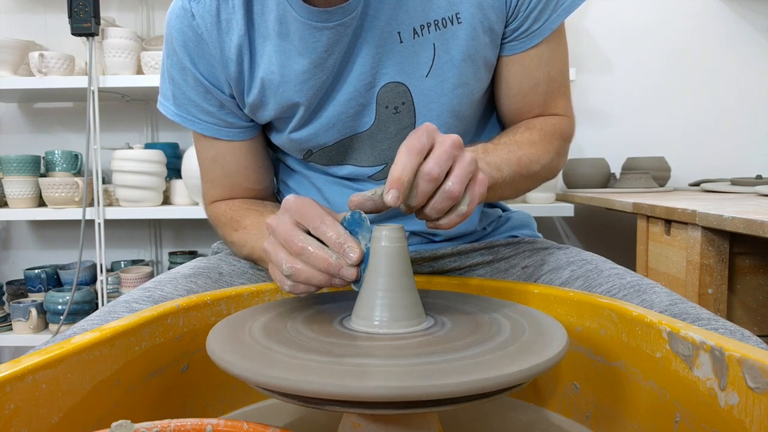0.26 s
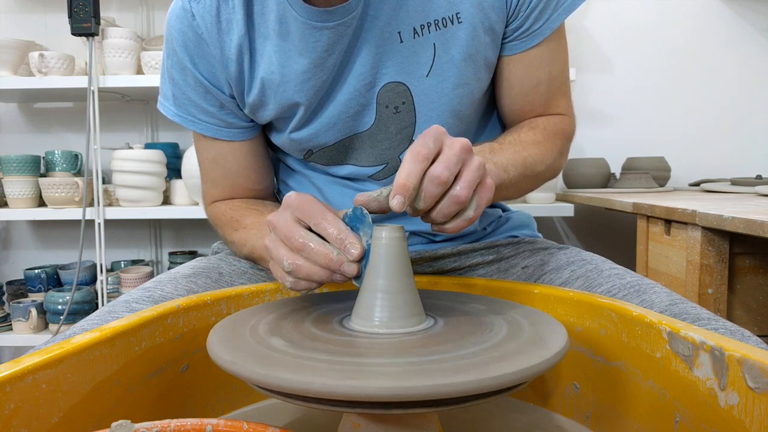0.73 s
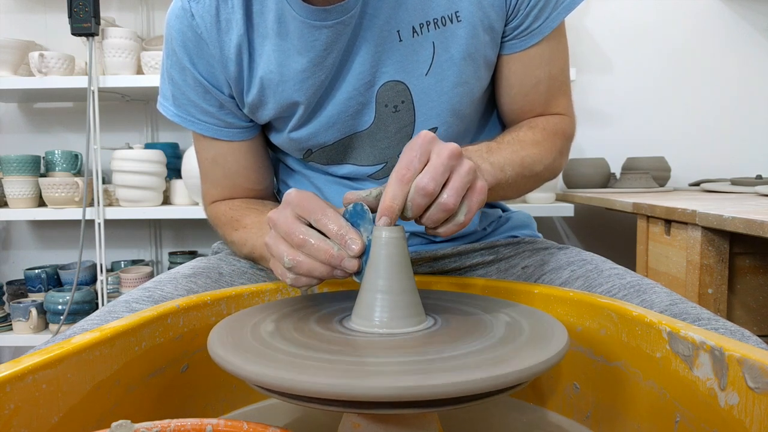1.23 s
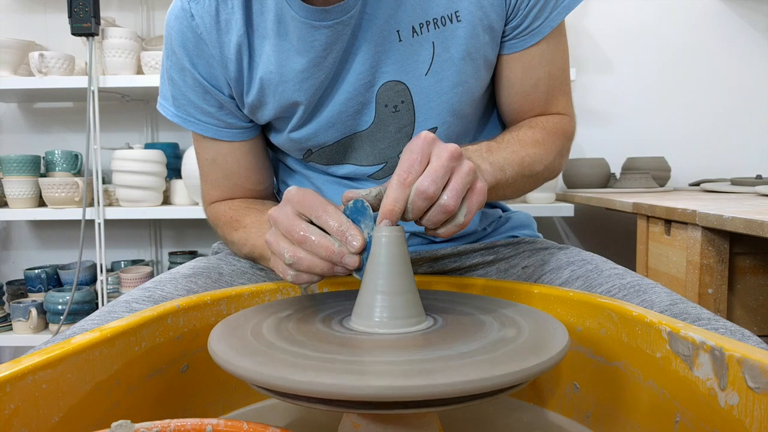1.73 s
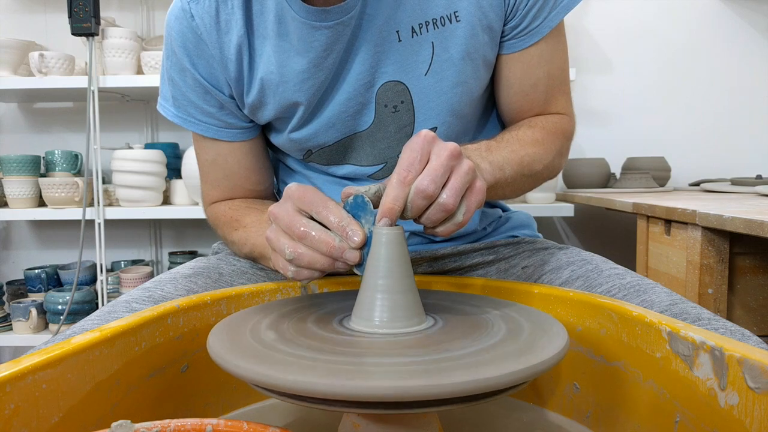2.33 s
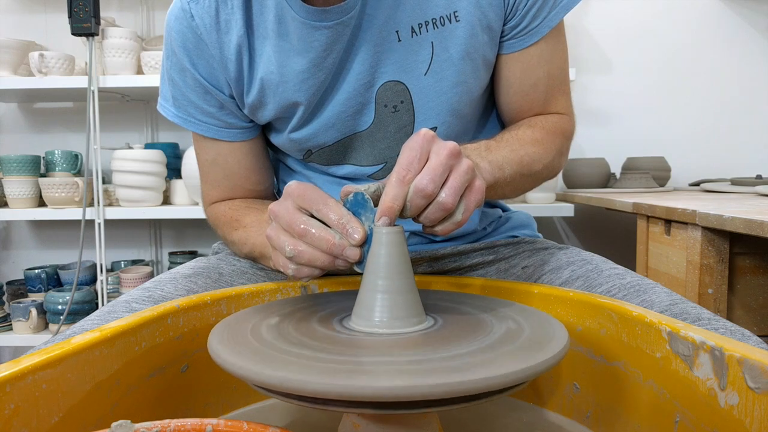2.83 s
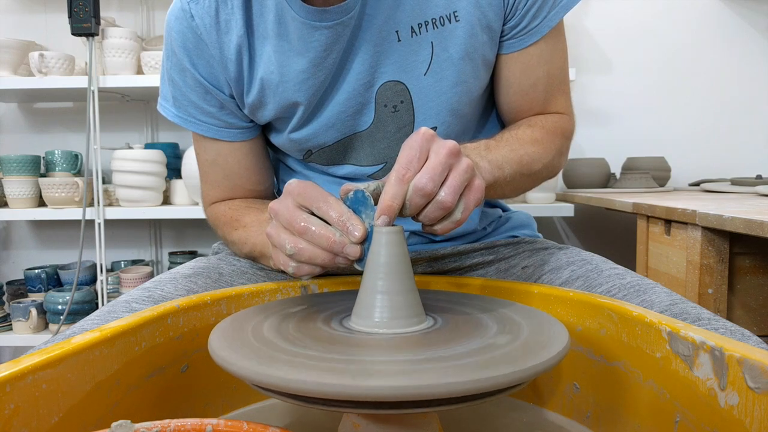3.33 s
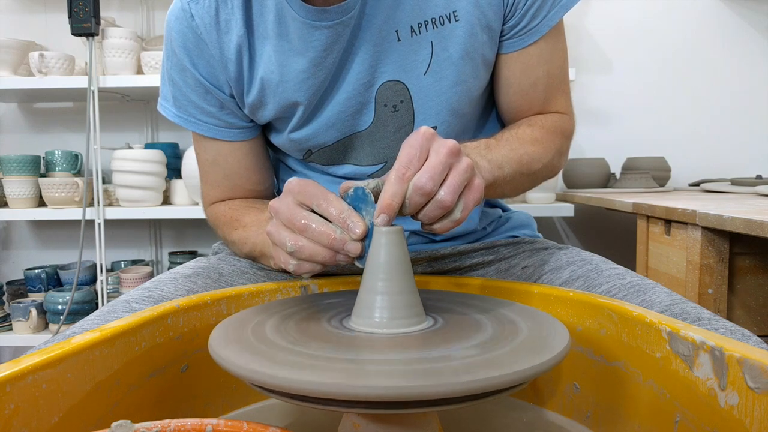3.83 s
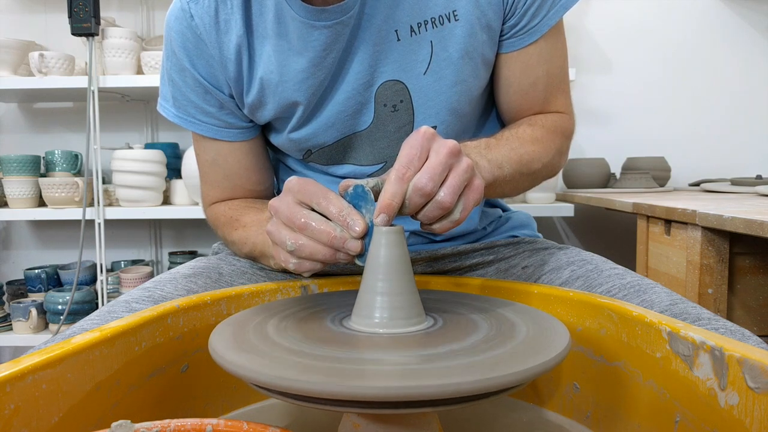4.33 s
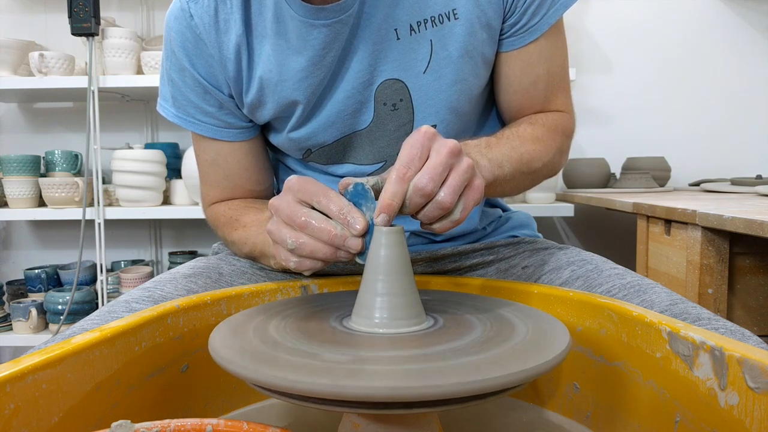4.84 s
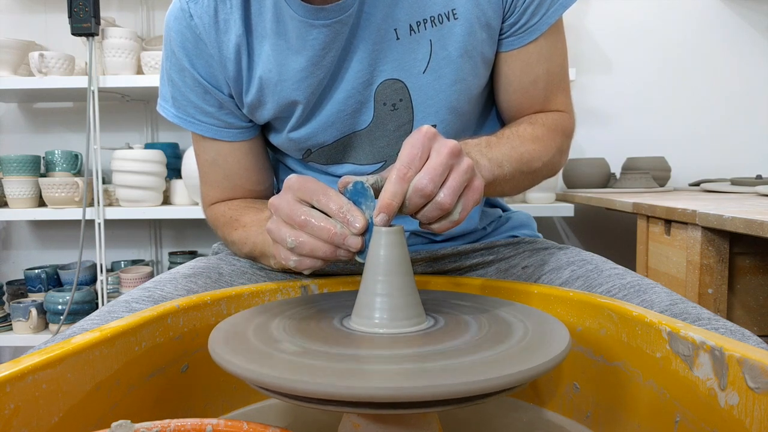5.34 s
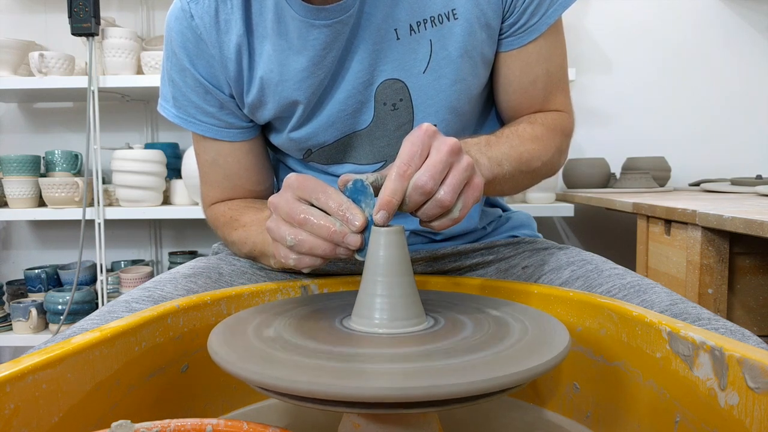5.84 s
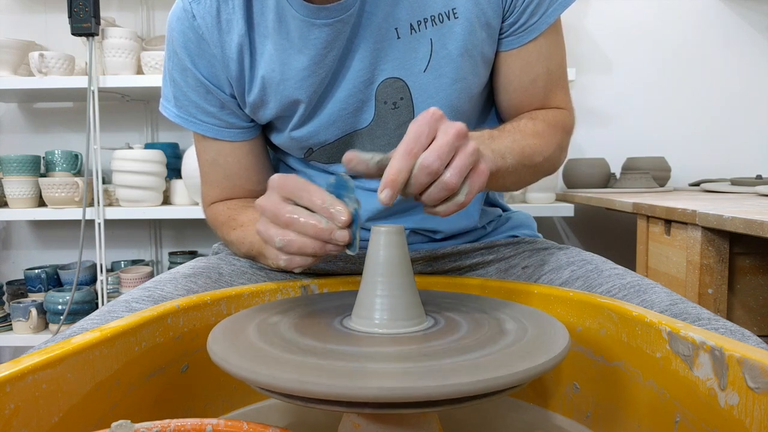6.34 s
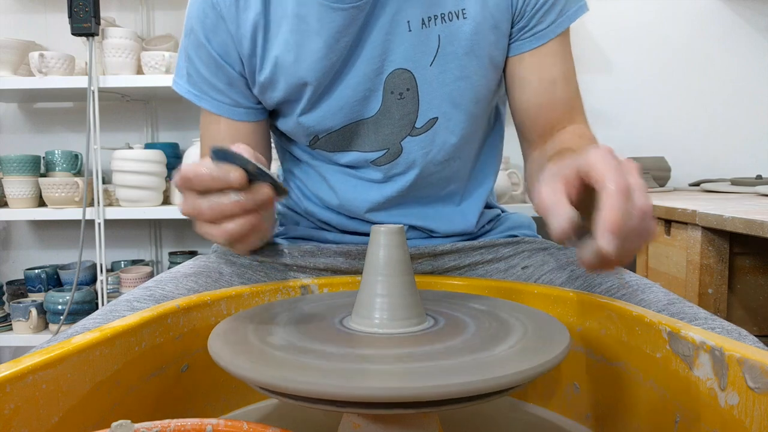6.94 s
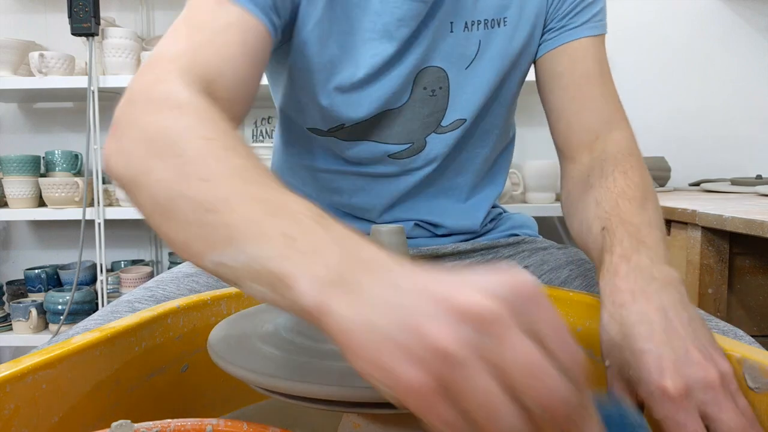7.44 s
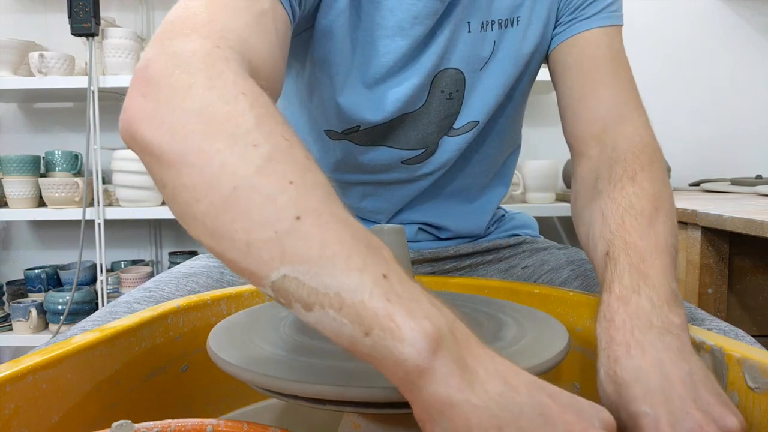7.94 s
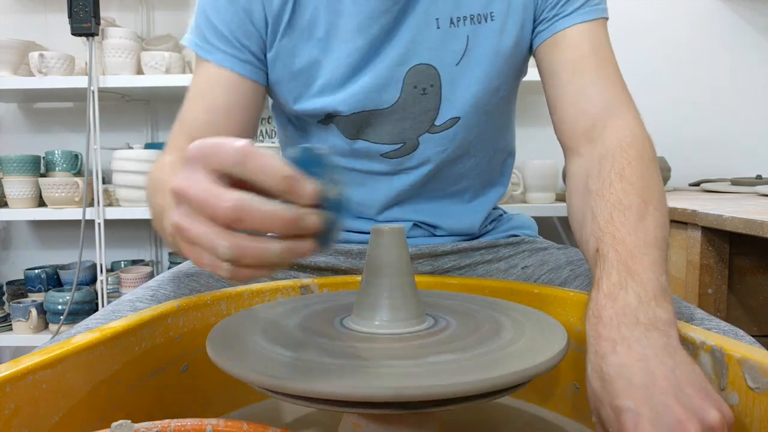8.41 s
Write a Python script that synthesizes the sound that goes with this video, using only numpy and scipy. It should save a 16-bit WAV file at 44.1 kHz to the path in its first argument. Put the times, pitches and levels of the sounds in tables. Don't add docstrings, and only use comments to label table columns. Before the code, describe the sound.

From 0 s an electric potter's wheel runs steadily, close to a phone in a small studio. A low hum around 100 Hz with strong overtones at 200, 300 and 400 Hz holds an unchanging pitch, edged by fine shaft buzz and a slow, subtle wobble. Over it lies a bright, grainy belt hiss, strongest around 5 to 7 kHz, fluttering lightly, with rough patches returning every 0.66 s alongside a soft low seam thump. Frame rumble sits beneath. Faint clay ticks come near 1.7, 3.8 and 4.3 s. From about 6.5 s the potter leans and reaches: the upper hum dulls and shifts, and soft low bumps occur near 7.1 and 7.4 s. Small ticks at 7.6 and 7.8 s precede a loud, dry crack at 8.1 s with a heavier tray bump. The hum continues to the end, around 8.7 s.

```python
import sys
import numpy as np
from scipy import signal
from scipy.fft import rfft, irfft, next_fast_len
from scipy.io import wavfile
from scipy.ndimage import uniform_filter1d

SR = 44100
rng = np.random.default_rng(int(sys.argv[2]) if len(sys.argv) > 2 else 0)


def master(y):
    cut = np.clip(np.atleast_2d(y).T, -1, 1)
    pcm = np.round(cut * 32767)
    wavfile.write(sys.argv[1], SR, pcm.astype(np.int16))


def magnitude_from_level(level_db):
    exponent = np.asarray(level_db, float) / 20
    return 10 ** exponent


N = 382347
t = np.arange(N) / SR
quarter = t[::4]
coarse = t[::64]
freq = np.fft.rfftfreq(next_fast_len(N), 1 / SR)
HUM_HZ, SHAFT_HZ, LAP_S = 99.9, 23.62, .6619


def shaped(x, gain):
    size = next_fast_len(N)
    return irfft(rfft(x, size) * gain, size)[:N]


def band(x, lo_hz, hi_hz):
    return shaped(x, (freq >= lo_hz) & (freq < hi_hz))


def coloured(points, rings, noise):
    hz, db = np.transpose(points)
    gain = magnitude_from_level(np.interp(np.log(freq + 1), np.log(hz), db, left=-140))
    for ring_hz, width, lift_db in rings:
        resonance = 1 / (1 + (2 * (freq - ring_hz) / width) ** 2)
        gain = gain * (1 + (magnitude_from_level(lift_db) - 1) * resonance)
    return shaped(noise, gain) * np.sqrt(SR / 2)


def ring(at_s, hz, t60, rise_s):
    out = np.zeros(N)
    i = int(at_s * SR)
    age = t[:min(int(1.2 * t60 * SR), N - i)]
    envelope = (1 - np.exp(-age / rise_s)) * magnitude_from_level(-60 * age / t60)
    out[i:i + len(age)] = np.sin(2 * np.pi * hz * age) * envelope
    return out


def tone(db, phase):
    level = np.interp(quarter, coarse, magnitude_from_level(db + 0 * coarse))
    return np.sqrt(2) * level * np.cos(phase)


def walk(rate):
    k = int(SR / 64 / rate)
    held = np.repeat(rng.standard_normal(len(coarse) // k + 1), k)
    return 1.28 * uniform_filter1d(uniform_filter1d(held, k), k)[:len(coarse)]


def gain_of(db):
    return np.interp(t, coarse, magnitude_from_level(db + 0 * coarse))


def rise(at_s, takes_s):
    return np.clip((coarse - at_s) / max(takes_s, .01), 0, 1)


# (start [s], end [s], share of a full reach [0-1])
REACH_TIMES = [
    (6.972, 7.3, 0.5),
    (7.54, 8.17, 1.01),
    (8.5, 8.8, 0.6),
]
# (time [s], multiple of the hum [1], level [dB])
HAND_SWEEPS = [(7.03, 1, -3), (7.47, 1, -1.5), (8.04, 3, 3), (8.0, 4, 1.2), (7.28, 3, -2)]
# (multiple [1], slow sag [dB/s], bent over [dB], arm out [dB], pulley wobble [dB])
LINE_ANSWERS = [(1, -0.17, 0, 0.8, -1), (2, -0.15, 0.9, 2, -0.03), (3, -0.0461, -2.5, -0.5, 0.7),
                (4, -0.04, -1, 1.1, -0.23), (6, -0.06, -2, 1.7, 0.2), (8, 0.1, -.9, 2.7, -0.6)]


def body():
    bend = rise(6.43, .75)
    reach = 0
    for start_s, end_s, share in REACH_TIMES:
        reach = reach + share * (rise(start_s, .11) - rise(end_s, .11))
    wobble = np.cos(2 * np.pi * 1.845 * (coarse - 0.032))
    wobble = wobble + 0.37 * (2 * wobble ** 2 - 1)
    causes = np.array([coarse, bend, reach, wobble])
    change = {k: np.array(row) @ causes for k, *row in LINE_ANSWERS}
    for at_s, k, db in HAND_SWEEPS:
        change[k] = change[k] + db * np.exp(-((coarse - at_s) / 0.055) ** 2)
    return change


# (multiple of the hum [1], level [dB], sideband one shaft turn below [dB], above [dB])
HUM_LINES = [(1, -49, -71.5, -64.5), (2, -48.4, -86, -79), (3, -41.5, -83, -69), (4, -45.9, -78.5, -79),
             (5, -73.5, -89, -76.5), (6, -62, -84, -76), (7, -61, -96, -75.5), (8, -62.5, -96, -79.5),
             (9, -74, -87, -84), (10, -75.5, -79, -94), (11, -78.5, -90, -82), (12, -90, -79.5, -85.0),
             (13, -75, -77, -82), (14, -69, -77, -94), (15, -73.5, -87, -79.5), (16, -79.5, -91, -99),
             (17, -86, -84, -97), (18, -83.5, -99.5, -101)]
OPPOSED = (1, 6, 13, 14, 15)
RESONANCE_LEAD = {3: .67, 6: .7, 7: .4, 8: -.9, 14: -1.0}


def hum(shade_db):
    change = body()
    drift = .024 * (quarter - 2.9) ** 2
    phase = 2 * np.pi * HUM_HZ * quarter - .97 + drift
    turn = 2 * np.pi * SHAFT_HZ * quarter
    start = 2 * np.pi * rng.random((len(HUM_LINES), 2))
    out = 0
    for (k, db, below_db, above_db), (a, b) in zip(HUM_LINES, start):
        wander_db = 0.37 if k < 5 else 0.94
        db = db + change.get(k, 0) + wander_db * walk(6.5)
        db = db + shade_db * (1.7 * (7 < k < 10) + .6 * (9 < k < 13))
        side_shade_db = shade_db * (7 < k < 14)
        lag = np.pi * (k in OPPOSED) + RESONANCE_LEAD.get(k, 0)
        out = out + tone(db, k * phase + lag)
        out = out + tone(below_db + side_shade_db, k * phase - turn + a)
        out = out + tone(above_db + side_shade_db, k * phase + turn + b)
    return out


# (multiple of the shaft rate [1], level [dB])
SHAFT_LINES = [(3, -71), (6, -65.5), (9, -73), (12, -73), (14, -79), (18, -79), (23, -77), (25, -75),
               (26, -80), (27, -77.5), (31, -74), (32, -77), (34, -87), (44, -77), (54, -90), (56, -78.5),
               (58, -82), (59, -78), (63, -73.5), (65, -75), (73, -87), (76, -88.0), (83, -83), (85, -82),
               (96, -83.5), (104, -81), (112, -88), (116, -83), (163, -82), (178, -80)]
LIFTED_LINES = (23, 63)


def shaft(shade_db):
    out = 0
    for k, db in SHAFT_LINES:
        shading = (33 < k < 41) - .5 * (k in LIFTED_LINES)
        start = 2 * np.pi * rng.random()
        out = out + tone(db + walk(4) + shade_db * shading, 2 * np.pi * k * SHAFT_HZ * quarter + start)
    return out


# (frequency [Hz], level [dB per Hz])
HISS_SPECTRUM = [(1750, -101.5), (2100, -96), (2700, -96.5), (3400, -99.1), (3800, -96.5), (4400, -96),
                 (4900, -90), (5300, -94.5), (6000, -89.5), (6800, -88), (7500, -92), (8100, -98.5),
                 (10000, -103.4), (15000, -107.8)]
# (frequency [Hz], width [Hz], lift [dB])
PULLEY_RINGS = [(2040, 22, 2), (2360, 15, 0.5), (2655, 27, 6), (3080, 65, 4.5), (3726, 50, 3.5),
                (3990, 27, 2), (4120, 29, 4.5), (4460, 22, 5), (4590, 37, 6), (6870, 350, 2), (5470, 30, 7),
                (6610, 40, 2.5), (9020, 33, 5), (9700, 22, 4.5)]
# (time into the lap [s], width [s], lift at 4.5 kHz [dB], 6.5 kHz [dB], 9 kHz [dB])
ROUGH_SPOTS = [(.163, .007, -.3, 2, -1), (.25, .05, -.8, -1.3, -2), (.313, .013, 0.5, 2, 4),
               (.357, 0.015, 2.4, 4.8, 6.1), (.41, .035, -0.3, -1, 0), (.5, .04, -0.3, 0.3, -1.8),
               (.598, 0.013, 1.6, -2.5, 3.5), (.638, .015, 1, 0.3, 3)]
HISS_BANDS = (1750, 3400, 4400, 5500, 6500, 7800, 11000, 22000)


def belt(shade_db):
    slips = rng.standard_normal(N) * magnitude_from_level(np.minimum(2.0 * rng.exponential(1, N), 10.2))
    age = np.arange(4000)
    smear = rng.standard_normal(len(age)) * np.exp(-age / (0.023 * SR)) * (age > 200)
    smear[0] = 50.0
    x = signal.fftconvolve(slips, smear)[:N]
    x = coloured(HISS_SPECTRUM, PULLEY_RINGS, x / np.std(x))

    lap, place = np.divmod(coarse, LAP_S)
    lap = lap.astype(int)
    strength = 1 + .1 * rng.standard_normal((lap[-1] + 1, len(ROUGH_SPOTS)))
    bumps = []
    for k, (at_s, width_s, *_) in enumerate(ROUGH_SPOTS):
        bumps.append(strength[lap, k] * np.exp(-((place - at_s) / width_s) ** 2))
    mid, upper, top = np.array(ROUGH_SPOTS)[:, 2:].T @ bumps

    turn = 2 * np.pi * SHAFT_HZ * coarse
    flutter = .5 * np.cos(turn - 2.0) + .5 * np.cos(2 * turn + 3.2)
    flutter = flutter + .5 * np.cos(3 * turn + 2.7) + 0.2 * np.cos(5 * turn + 2.3)
    arms = -.2 * shade_db
    tight = np.cos(2 * np.pi * (place - .53) / LAP_S)
    # lift [dB], flutter depth [dB], random patchiness [dB]
    lifts = (.15 * mid, 0.26 * mid + .25 * upper, mid + .8 * tight, upper + 1.4 * tight,
             0.64 * upper + .15 * top + .55 * tight, top + .45 * tight + arms, 0.36 * top + arms)
    depths = (1.1, 0.59, 0.36, 1.7, 0.83, 0.36, 0.18)
    patchy = (0.24, 0.45, .45, .45, .5, .55, 0.76)
    out, shared = 0, walk(25)
    for lo, hi, lift, depth, own in zip(HISS_BANDS, HISS_BANDS[1:], lifts, depths, patchy):
        level_db = lift + depth * flutter + .3 * shared + own * walk(10) + 0.2
        out = out + band(x, lo, hi) * gain_of(level_db)
    return out


# (frequency [Hz], level [dB], t60 [s])
SEAM_MODES = [(59.6, -51.5, 1.8), (143, -67.5, 3.5), (120, -61, 0.44)]
LAP_LEVELS = [-3, 1, 4, 1, 1, 0.1, 0.1, -2, 1.1, 1, 4, 0, 2]
# (time [s], level [dB], frequency [Hz])
TRAY_BUMPS = [
    (3.15, -60, 60),
    (6.45, -60, 52),
    (7.1, -58, 50.4),
    (7.43, -58, 45),
    (8.13, -46, 50.3),
    (8.45, -53, 48.7),
]


def thumps():
    out = 0
    for lap, lap_db in enumerate(LAP_LEVELS):
        for hz, db, t60 in SEAM_MODES:
            out = out + magnitude_from_level(db + lap_db) * ring(.36 + LAP_S * lap, hz, t60, .02)
    for at_s, db, hz in TRAY_BUMPS:
        out = out + magnitude_from_level(db) * ring(at_s, hz, .6, .015)
    return out


# (time [s], peak level [dB], ring frequency [Hz], t60 [s])
CLAY_TICKS = [
    (1.6796, -47, 6900, .03),
    (3.7609, -43, 6840, .008),
    (4.3261, -50, 6800, .02),
    (7.636, -46, 6560, 0.017),
    (7.7934, -41, 6600, .006),
    (8.107, -26, 6400, 0.0041),
]


def ticks():
    ratios = (.95, 1.02, 1.12, 1.3, 1.6) + 0.008 * rng.standard_normal((len(CLAY_TICKS), 5))
    shares = magnitude_from_level([-9, 1.5, 2.0, -6, -18])
    out = 0
    for (at_s, db, hz, t60), row in zip(CLAY_TICKS, ratios):
        crack_s = at_s + .00125
        for ratio, share in zip(row, shares):
            out = out + share * magnitude_from_level(db) * ring(crack_s, hz * ratio, t60, 0.00042)
    return out


# (frequency [Hz], level [dB per Hz])
RUMBLE_SPECTRUM = [(22, -102), (40, -89.5), (60, -83), (90, -84), (130, -85.5), (170, -87), (250, -85),
                   (350, -88.5), (450, -91.5), (600, -91), (850, -95.5), (1200, -94.5), (1550, -95.5),
                   (1750, -99)]
# (frequency [Hz], width [Hz], lift [dB])
FRAME_RINGS = [(60, 10, 8.5), (111, 7.4, 8), (144, 3, 6), (301.6, 9.3, 13.5), (398, 14, 8), (503, 8, 5),
               (544, 9.3, 11.5), (633, 8, 2), (725, 9.7, 10), (730, 6.6, -7), (780, 4.7, -2),
               (1025, 3.5, 10), (1150, 11, 6.5), (1288, 3.6, 3), (1460, 8.3, 7), (1530, 16, 10)]


def rumble(shade_db):
    again = 0.55
    lap = np.resize(rng.standard_normal(round(LAP_S * SR)), N)
    noise = np.sqrt(again) * lap + np.sqrt(1 - again) * rng.standard_normal(N)
    x = coloured(RUMBLE_SPECTRUM, FRAME_RINGS, noise)
    x = x - band(x, 1750, SR / 2)
    x = x + 0.17 * np.cos(2 * np.pi * HUM_HZ * t - 1.2) * band(x, 490, 1750)
    return x + (gain_of(shade_db) - 1) * band(x, 780, 1270)


GAP_BANDS = (11200, 11900, 12700, 13400, 14150, 14950, 16000)


def gaps(x):
    gap_s, gaps_per_s, gap_db = .021, 10, -22
    frame = (coarse / gap_s).astype(int)
    out = x
    for k, (lo, hi) in enumerate(zip(GAP_BANDS, GAP_BANDS[1:])):
        shut = rng.random(1000)[frame] < gaps_per_s * gap_s * (k + 1) / 21
        gain = uniform_filter1d(magnitude_from_level(gap_db * shut), size=5)
        out = out + band(x, lo, hi) * (np.interp(t, coarse, gain) - 1)
    return out


# (time [s], level [dB])
ARM_SHADE = [(0, 0), (6.45, 0), (6.59, -7), (6.68, 0), (7.0, -.5), (7.1, -6), (7.6, -6.5), (8.05, -5),
             (8.3, -6.5), (8.67, -5)]


def scene():
    shade_db = np.interp(coarse, *np.transpose(ARM_SHADE))
    tones = signal.resample_poly(hum(shade_db) + shaft(shade_db), 4, 1)[:N]
    return (tones + belt(shade_db) + thumps() + ticks() + rumble(shade_db))[None]


def top_cut(x):
    return signal.sosfilt(signal.butter(12, 15840, fs=SR, output="sos"), x)


def record(dry):
    limited = band(dry[0], 0, 15720)
    mix = gaps(limited)[None] - .0007
    return top_cut(mix)


dry = scene()
out = record(dry)
master(out)
```